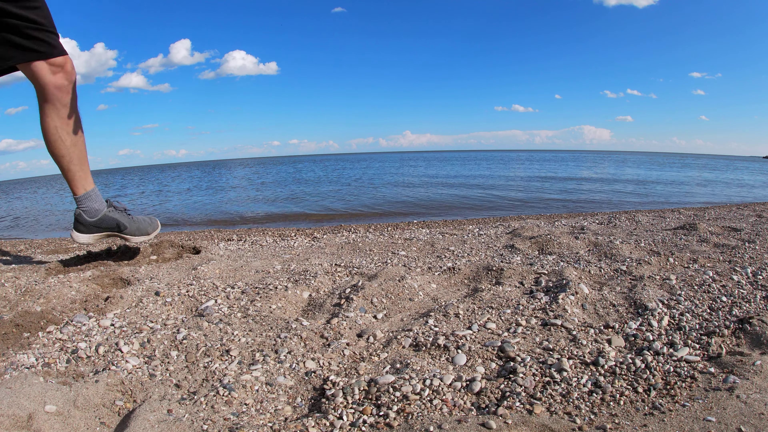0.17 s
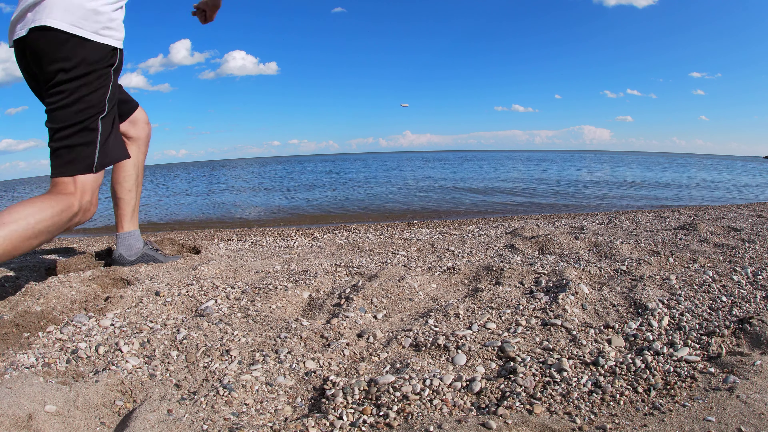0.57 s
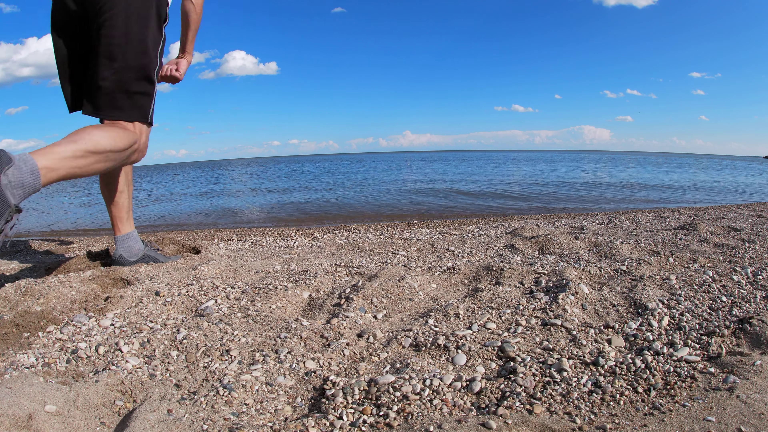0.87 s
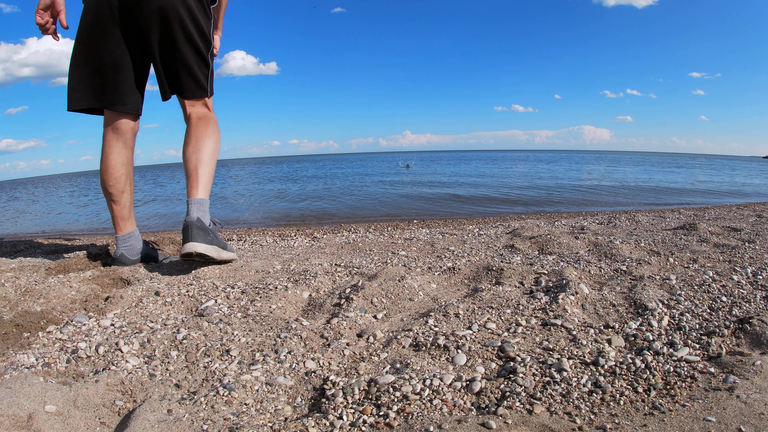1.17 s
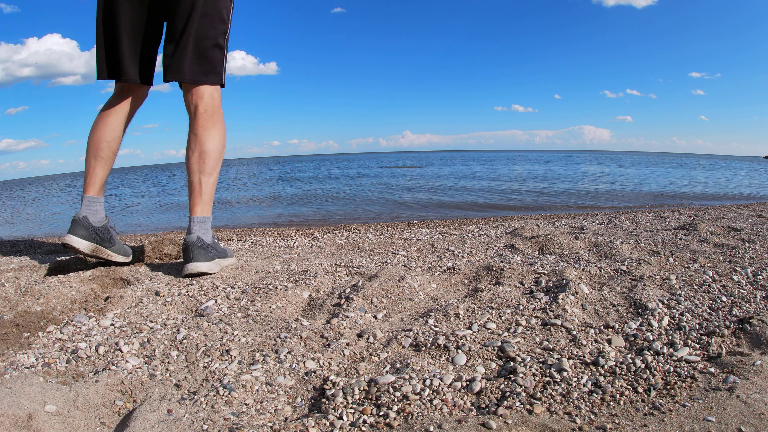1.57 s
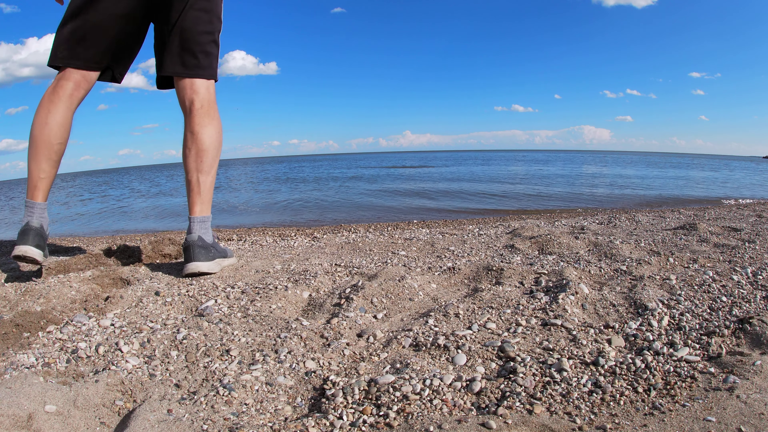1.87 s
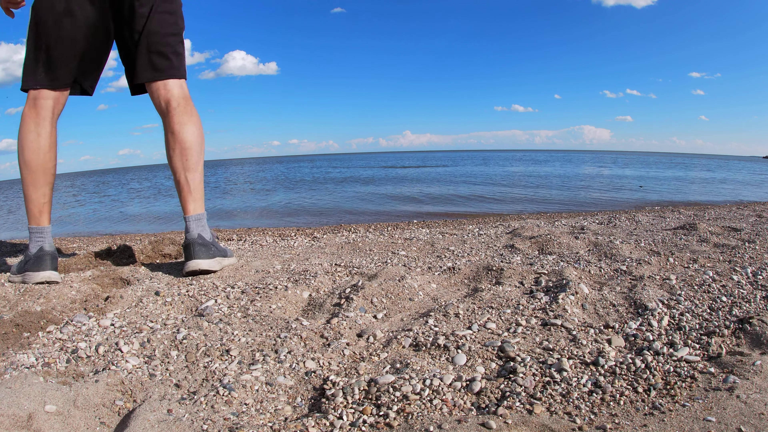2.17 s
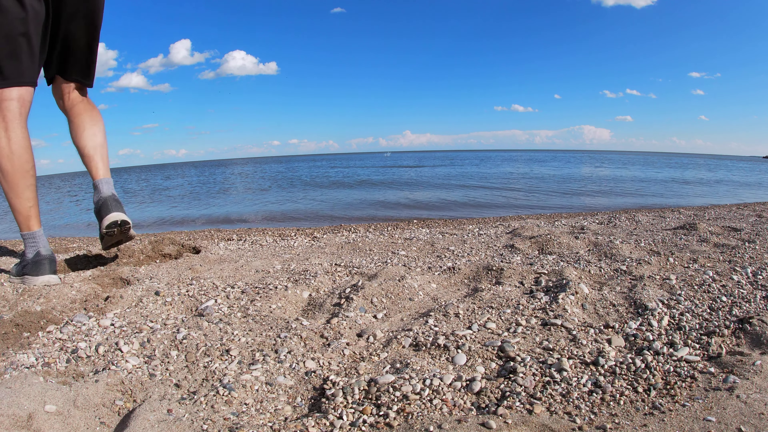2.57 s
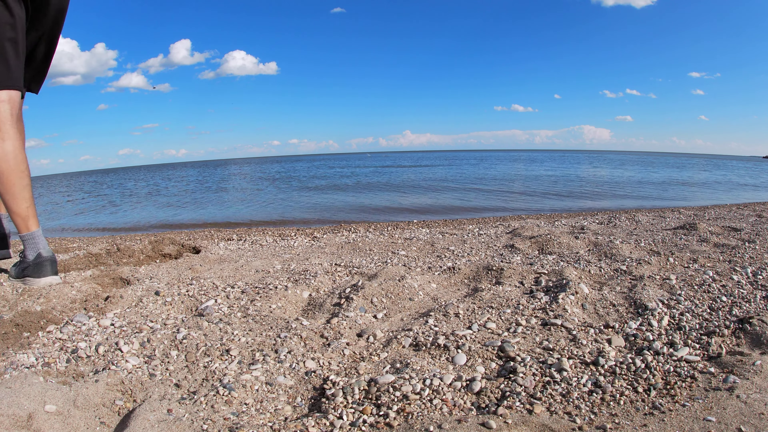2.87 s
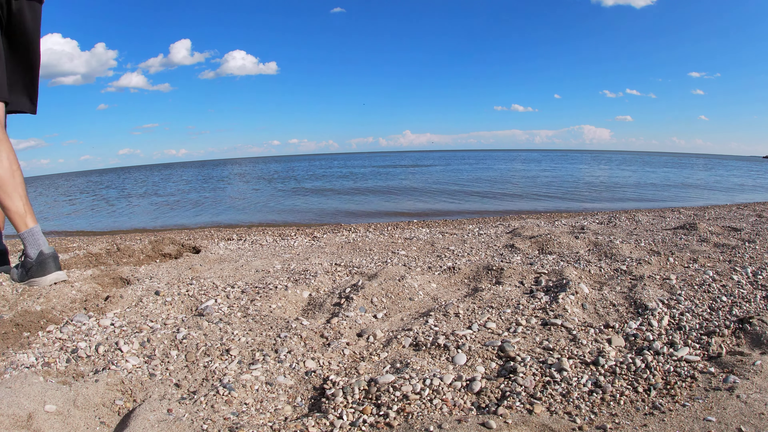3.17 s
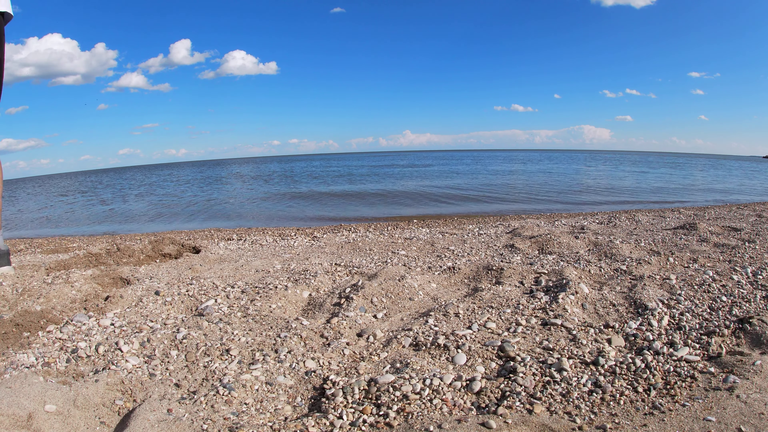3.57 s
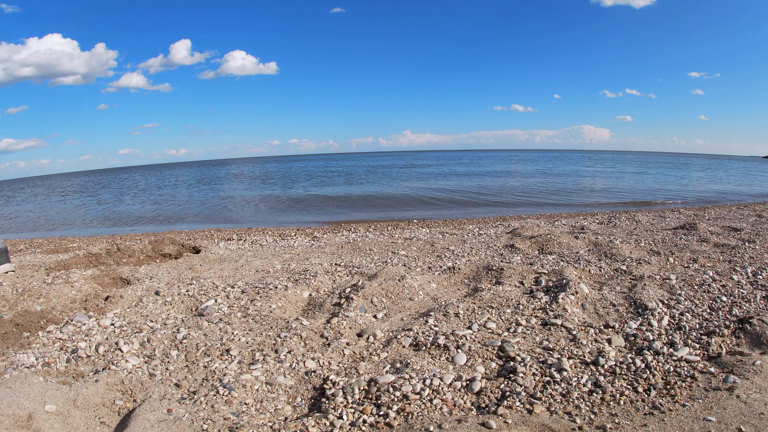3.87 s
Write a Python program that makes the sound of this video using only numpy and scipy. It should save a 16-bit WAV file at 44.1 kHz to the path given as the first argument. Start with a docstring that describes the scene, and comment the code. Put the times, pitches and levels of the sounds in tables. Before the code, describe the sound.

Footsteps crunch and scuff on a gravel lakeshore close to a low microphone, with loose pebbles clicking. Gusts of wind rumble and pop loudly midway, then small waves lap in near the end as the steps move off.

```python
"""Footsteps on a gravel lakeshore: someone lunges, shuffles and walks off, close to a low microphone.
Each push of a shoe sets off a shower of grains and sand, and loose pebbles click against each other.
Gusts rumble, flutter and pop on the microphone. The lake hisses throughout, and near the end
small waves wash in, their crests lapping over in bubbles."""
import sys
import numpy as np
from scipy import signal
from scipy.fft import rfft, irfft, next_fast_len
from scipy.io import wavfile
from scipy.ndimage import map_coordinates

SR = 44100
rng = np.random.default_rng(int(sys.argv[2]) if len(sys.argv) > 2 else 0)


def master(y):
    """Save y as 16-bit WAV."""
    cut = np.clip(np.atleast_2d(y).T, -1, 1)
    pcm = np.round(cut * 32767)  # scale
    wavfile.write(sys.argv[1], SR, pcm.astype(np.int16))


N = 176400
TOP_HZ = 15100

# Tone of the lake's hiss, its fizz, the wind's rumble and buffeting, the air, the gravel and the wash.
# Each row: frequency in Hz, relative level in dB.
LAKE_TONE = [(150, 2.5), (400, 8), (1000, 1), (2000, -3.5), (3100, -11.5), (5900, -10), (7500, -46.5),
             (13000, -100)]
FIZZ_TONE = [(3000, -5), (4800, -6), (5800, -0.5), (6800, -6.5), (8500, -8.5), (10000, -13), (12500, -24.5),
             (14500, -32)]
RUMBLE_TONE = [(10, -16), (25, -1), (45, 2.5), (70, -1.5), (115, -8.5), (160, -15), (260, -43.5),
               (500, -81.5), (2000, -150)]
BUFFET_TONE = [(60, -28), (130, 7), (230, -1.5), (320, -10.5), (450, -22), (700, -37.5), (1200, -51),
               (2500, -89), (6000, -150)]
AIR_TONE = [(6000, -21), (9000, -2), (12500, -0.5), (14500, -29.5), (16000, -41.5)]
GRAVEL_TONE = [(60, -14), (200, 7), (600, 4.5), (1000, -0.5), (1500, -6), (2200, -8), (3200, -14),
               (5300, -18.5), (8500, -30), (11000, -45), (13500, -53.5), (15000, -63)]
WASH_TONE = [(60, 1.5), (250, 6.5), (550, 2), (900, -11.5), (1400, -18), (2200, -24.5), (3500, -28.5),
             (5800, -50), (7500, -69), (14000, -88)]
# Fader rides for the water and wind beds. Each row: time in seconds, level in dB.
LAKE_RIDE = [(0, -54.5), (.95, -61), (1.2, -65.5), (1.8, -74), (2.3, -62.5), (2.65, -65), (3.1, -58),
             (3.7, -63), (4, -56.5)]
FIZZ_RIDE = [(0, -76), (.3, -72), (1.2, -70.5), (1.55, -65.5), (1.8, -72), (2.2, -71), (2.55, -86.5),
             (2.85, -92), (3.2, -86), (4, -76.5)]
RUMBLE_RIDE = [(0.0, -50), (0.27, -65), (0.6, -41), (0.69, -23), (0.78, -42.5), (0.8, -28.5), (0.85, -46),
               (1.36, -38.5), (1.43, -22), (1.61, -15.5), (1.63, -21.5), (1.96, -24.5), (1.98, -38.5),
               (2.04, -18.5), (2.52, -30), (2.55, -32), (2.66, -38), (2.73, -30), (3.01, -31),
               (3.22, -21.5), (3.42, -34.5), (3.48, -20.5), (3.54, -34.5), (3.58, -26), (3.68, -40),
               (3.75, -20), (3.8, -33), (3.91, -34.5), (3.94, -21), (4.0, -45)]
BUFFET_RIDE = [(0, -51), (.36, -56), (.46, -57.5), (.6, -55), (.66, -30.5), (.71, -40), (.745, -68),
               (.95, -60), (1.25, -53.5), (1.39, -51.5), (1.44, -42), (1.53, -37), (1.61, -28.5),
               (1.72, -32), (1.79, -23), (1.94, -44.5), (1.98, -53.5), (2.04, -45), (2.12, -26), (2.3, -26),
               (2.38, -23), (2.43, -31), (2.51, -18), (2.535, -39), (2.58, -38), (2.68, -50), (2.74, -32.5),
               (2.83, -48.5), (2.92, -37), (3.07, -40), (3.2, -25), (3.3, -37.5), (3.42, -34), (3.49, -33),
               (3.53, -46.5), (3.59, -34.5), (3.65, -66), (3.75, -43), (3.8, -47), (3.9, -48), (3.96, -39),
               (4, -52)]
# Shoes in gravel. Each row: time of full force, rise, hold and 60 dB decay in seconds, level in dB,
# treble tilt in dB per octave, treble cutoff in Hz.
SHOE_PUSHES = [(0.166, 0.066, 0.019, 0.29, -40.5, 1.95, 6760), (0.235, 0.015, 0.019, 0.86, -51.5, 1, 6360),
               (0.32, 0.012, .008, 0.43, -65.5, 6, 6940), (0.457, 0.047, 0.047, 0.081, -37.5, -2.5, 14000),
               (0.464, 0.036, 0.025, 0.079, -49, 9, 15000), (.643, 0.011, 0.009, 0.13, -48.5, -5, 13000),
               (0.524, 0.015, 0.011, 0.15, -37.5, 2, 8450), (0.623, 0.055, 0.038, 0.16, -41, 3.5, 12000),
               (0.685, 0.016, 0.0099, .1, -47.5, 1.5, 9000), (0.82, 0.069, 0.048, 0.2, -52.5, 4.5, 10000),
               (0.86, 0.013, 0.016, 0.033, -50, -1.5, 11000), (0.947, 0.027, 0.084, 0.95, -67, 9, 7900),
               (1.069, 0.0019, 0.0011, 0.031, -42, 8, 16000),
               (1.294, 0.0036, 0.019, 0.052, -38.5, 2, 19000), (1.327, 0.063, 0.076, 0.93, -55.5, 6, 12300),
               (2.14, 0.0343, .02, 0.54, -65.5, 12, 9100), (2.21, 0.048, 0.019, 0.41, -60.5, 4.5, 8040),
               (3.027, 0.097, .02, .3, -55.5, 3, 5570), (3.24, 0.047, 0.02, 0.94, -47, 3, 5300),
               (3.427, 0.031, .012, 0.11, -51, 2.5, 6400), (3.98, 0.03, .04, .3, -48, 2.5, 9000)]
# Pebbles knocking. Each row: start in seconds, peak in dB, pitch in Hz.
PEBBLE_KNOCKS = [(.089, -42, 1200), (.119, -36.5, 825), (0.237, -38, 1150), (0.243, -44.5, 5000),
                 (.319, -42.5, 2000), (0.36, -41.5, 1150), (.465, -23.5, 720), (.866, -37, 850),
                 (0.926, -57, 7450), (.989, -51.5, 5570), (1.395, -50, 2100), (1.418, -42, 4200),
                 (1.441, -46, 3580), (1.469, -45.5, 2530), (1.484, -44, 2800), (1.491, -48, 3450),
                 (1.543, -49.5, 4500), (1.592, -50, 4400), (1.64, -54, 2350), (1.874, -52.5, 2200),
                 (1.874, -59, 4800), (1.935, -54, 2820), (1.98, -63, 6440), (2.1, -55, 4070),
                 (2.125, -54, 6400), (2.144, -49.5, 6500), (2.157, -52, 6760), (2.216, -48.5, 5200),
                 (2.232, -53.5, 5000), (2.362, -57, 5550), (2.437, -60.5, 5600), (3.031, -39.5, 1170),
                 (3.066, -36, 750), (3.43, -51.5, 5200), (3.594, -43.5, 1010), (3.781, -58, 4130),
                 (3.796, -57, 5200), (3.855, -55, 4000)]
# Eddies on the microphone. Each row: centre time and half-length in seconds, peak in dB, cutoff in Hz.
EDDY_SLAPS = [(0.656, 0.0033, -19.5, 120), (0.684, 0.0022, -12.5, 155), (0.711, 0.011, -22.5, 168),
              (1.515, 0.0084, -9.5, 142), (1.544, 0.0057, -17, 225), (1.589, 0.0019, -10, 195),
              (1.639, 0.0031, -8.5, 167), (1.758, 0.0017, -14.5, 151), (1.79, 0.0021, -18, 201),
              (1.805, 0.0039, -25.5, 314), (1.853, 0.0074, -18.5, 256), (1.92, 0.0052, -19, 267),
              (2.026, 0.001, -13, 140), (2.152, 0.0047, -16.5, 211), (2.202, 0.0088, -21.5, 486),
              (2.211, 0.0046, -9.5, 216), (2.233, 0.0098, -15, 433), (2.247, 0.0035, -5.5, 230),
              (2.278, 0.0063, -15, 423), (2.302, 0.0039, -19, 590), (2.306, 0.0051, -5, 276),
              (2.332, 0.003, -10, 260), (2.352, 0.011, -11, 191), (2.381, 0.0026, -10, 225),
              (2.413, 0.0067, -14, 148.5), (2.467, 0.0041, -11.5, 217), (2.497, 0.014, -16, 453),
              (2.514, 0.0014, -11.5, 166), (3.348, 0.003, -21, 279), (3.475, 0.009, -19.5, 187),
              (3.756, 0.011, -25.5, 244)]
# Single pushes of air. Each row: centre time in seconds, peak in dB, centre frequency in Hz.
AIR_PUSHES = [(1.579, -16.5, 245), (1.65, -18.5, 172), (1.8072, -18, 425), (1.879, -20, 175),
              (1.956, -27.5, 180), (2.067, -19.5, 150), (2.251, -21, 390), (2.284, -13.5, 290),
              (2.391, -14, 260), (2.487, -21.5, 440)]
# Small waves. Each row: crest time, rise, hold and 60 dB decay in seconds, level in dB.
WAVE_SWELLS = [(2.911, 0.14, .03, 0.17, -52), (3.121, 0.16, 0.096, 0.94, -37),
               (3.479, 0.062, 0.024, 0.37, -47), (3.613, 0.041, 0.023, 0.22, -53),
               (3.69, 0.035, 0.031, 0.91, -51.5), (3.99, 0.059, .04, .5, -37.5)]
# Lapping crests. Each row: crest time, rise, hold and 60 dB decay in seconds, level in dB,
# bubble pitch in Hz.
CREST_LAPS = [(3.09, .03, 0.042, 0.26, -43, 814), (3.24, 0.09, .04, 0.5, -49, 1257),
              (3.426, 0.018, .015, .15, -59, 1700), (3.48, 0.028, .02, 0.24, -47.5, 1050),
              (3.605, .02, 0.013, 0.14, -51.5, 880)]


def amp(db):
    """Decibels to gain."""
    return 10 ** (np.asarray(db) / 20)


def unit(x):
    """Scale to rms 1."""
    return x / np.sqrt(np.mean(x ** 2) + 1e-20)


def clock():
    """Time of every sample."""
    return np.arange(N) / SR


def fader(ride):
    """Gain per sample from (s, dB) points."""
    return amp(np.interp(clock(), *np.transpose(ride)))


def wobble(rate):
    """A smooth random curve, rate knots a second."""
    return map_coordinates(rng.standard_normal(1000), [clock() * rate], mode="wrap")


def filtered(x, response):
    """EQ x with a gain given as a function of Hz."""
    size = next_fast_len(len(x) + 8192)
    return irfft(rfft(x, size) * response(np.fft.rfftfreq(size, 1 / SR) + 1), size)[:len(x)]


def coloured(x, tone):
    """EQ x with a tone table, at rms 1."""
    freqs, db = np.transpose(tone)
    return unit(filtered(x, lambda hz: amp(np.interp(np.log(hz), np.log(freqs + 1), db))))


def grains(per_s, spread_db):
    """Random tiny impacts, a few much larger than the rest."""
    hits = rng.random(N) < per_s / SR
    size = np.minimum(rng.exponential(size=N), 4)
    return unit(hits * rng.choice([-1, 1], N) * amp(spread_db * size))


def swell(s, rise, hold, t60):
    """Rise to full force at s, hold, then die away."""
    t = clock() - s
    return np.exp(-(np.minimum(t, 0) / rise) ** 2) * amp(-60 * np.maximum(t - hold, 0) / t60)


def lake():
    """The water bed: a flickering, grainy hiss with a fine fizz on top."""
    hiss = coloured(rng.standard_normal(N) + 0.5 * grains(300, 4.8), LAKE_TONE)
    fizz = coloured(rng.standard_normal(N) + 0.6 * grains(400, 4.6), FIZZ_TONE)
    return hiss * fader(LAKE_RIDE) * amp(wobble(21)) + fizz * fader(FIZZ_RIDE)


def turbulence(tone, even_s):
    """Low noise whose strength stays even over spans longer than even_s."""
    noise = coloured(rng.standard_normal(N), tone)
    power = filtered(noise ** 2, lambda hz: np.exp(-(hz * even_s) ** 2))
    return unit(noise / np.sqrt(np.abs(power) + 0.036))


def gusts(flutter_db=4.5):
    """Wind on the microphone: slow pressure swings rumble, faster turbulence buffets."""
    rumble = turbulence(RUMBLE_TONE, even_s=0.2)
    buffet = unit(turbulence(BUFFET_TONE, even_s=0.051) * amp(flutter_db * wobble(45)))
    return rumble * fader(RUMBLE_RIDE) + buffet * fader(BUFFET_RIDE)


def air(db=-92):
    """A faint, steady high hiss."""
    return amp(db) * coloured(rng.standard_normal(N), AIR_TONE)


def gravel(sizes=14):
    """Stones of many sizes, each size ticking in its own band of pitch."""
    stones = np.zeros(N)
    for band in range(1, sizes + 1):
        ticks = grains(per_s=260, spread_db=3)
        stones += filtered(ticks, lambda hz: np.exp(-(sizes * np.sqrt(hz / TOP_HZ) - band) ** 2))
    return unit(stones)


def footsteps(sand_db=-3, flicker_db=0.7):
    """Each push of a shoe sets off a shower of gravel grains and sliding sand."""
    crunch = coloured(gravel() + amp(sand_db) * rng.standard_normal(N), GRAVEL_TONE)
    crunch *= amp(flicker_db * wobble(90))
    out = np.zeros(N)
    for s, rise, hold, t60, db, tilt_db, cutoff_hz in SHOE_PUSHES:
        eq = lambda hz: amp(tilt_db * np.log2(1 + hz / 900)) / np.hypot(1, (hz / cutoff_hz) ** 4)
        out += amp(db) * swell(s, rise, hold, t60) * unit(filtered(crunch, eq))
    return out


def pebbles(t60=0.014, attack_s=0.0011, crack_db=-9.5, ring_octaves=0.36):
    """Stone on stone: a crack and a very short ring."""
    out, t = np.zeros(N + SR), np.arange(SR // 10) / SR
    envelope = amp(-60 * t / t60) * (1 - np.exp(-t / attack_s))
    for s, db, pitch_hz in PEBBLE_KNOCKS:
        noise = rng.standard_normal(len(t))
        ring = unit(filtered(noise, lambda hz: np.exp(-(np.log2(hz / pitch_hz) / ring_octaves) ** 2)))
        crack = unit(filtered(noise, lambda hz: 1 / (1 + (hz / (1.5 * pitch_hz)) ** 6)))
        click = (ring + amp(crack_db) * crack) * envelope
        out[round(s * SR):][:len(t)] += amp(db) * click / np.abs(click).max()
    return out[:N]


def eddies(push=0.15, low_cut_ratio=0.37):
    """Sharp eddies slap the microphone: dull puffs of noise with a little plain pressure push."""
    out, t = np.zeros(N), np.arange(-SR // 10, SR // 10) / SR
    for s, half_length, db, cutoff_hz in EDDY_SLAPS:
        puff = np.exp(-(t / half_length) ** 2) * (push + rng.standard_normal(len(t)))
        high_cut = signal.butter(4, cutoff_hz, fs=SR, output="sos")
        low_cut = signal.butter(2, low_cut_ratio * cutoff_hz, "high", fs=SR, output="sos")
        puff = signal.sosfilt(low_cut, signal.sosfilt(high_cut, puff))
        out[round(s * SR) - len(t) // 2:][:len(t)] += amp(db) * puff / np.abs(puff).max()
    return out


def pops():
    """Single pushes of air pop the microphone, each one swing of pressure."""
    out = np.zeros(N)
    for s, db, centre_hz in AIR_PUSHES:
        phase = 2 * np.pi * centre_hz * (clock() - s)
        out += amp(db) * phase * np.exp((1 - phase ** 2) / 2)
    return out


def bubbles(per_s, centre_hz, spread_octaves=0.498, ring_cycles=5.4):
    """Short rising plops; bigger bubbles ring lower, louder and longer."""
    count, t = int(per_s * N / SR), np.arange(1500) / SR
    onset, force = rng.random((2, count, 1))
    hz = centre_hz * 2 ** (spread_octaves * np.clip(rng.standard_normal((count, 1)), -2, 2))
    age = hz * t / ring_cycles
    gain = (1 + 2 * force ** 2) * centre_hz / hz
    envelope = np.exp(-2 * age) * (1 - np.exp(-10 * age))
    plops = gain * envelope * np.sin(2 * np.pi * hz * t * (1 + 0.049 * age))
    samples = (onset * N).astype(int) + np.arange(len(t))
    return unit(np.bincount(samples.ravel(), plops.ravel(), N)[:N])


def waves(bubble_db=-4, flicker_db=0.31):
    """Small waves break in a grainy, bubbly wash."""
    wash = coloured(grains(1500, 2.9) + 0.4 * rng.standard_normal(N), WASH_TONE)
    wash = unit(wash + amp(bubble_db) * bubbles(per_s=380, centre_hz=693))
    wash *= amp(flicker_db * wobble(24.9))
    return wash * sum(amp(db) * swell(s, rise, hold, t60) for s, rise, hold, t60, db in WAVE_SWELLS)


def splashes():
    """Each crest laps over in a burst of bubbles."""
    return sum(amp(db) * swell(s, rise, hold, t60) * bubbles(per_s=250, centre_hz=hz)
               for s, rise, hold, t60, db, hz in CREST_LAPS)


def scene():
    """The mono mix: beds of water, wind and air under the spot sounds."""
    beds = lake() + gusts() + air()
    return (beds + footsteps() + pebbles() + eddies() + pops() + waves() + splashes())[None]


def record(dry):
    """A steep high cut takes off the very top."""
    return signal.sosfilt(signal.ellip(10, .1, 90, TOP_HZ, fs=SR, output="sos"), dry)


dry = scene()
out = record(dry)
master(out)
```